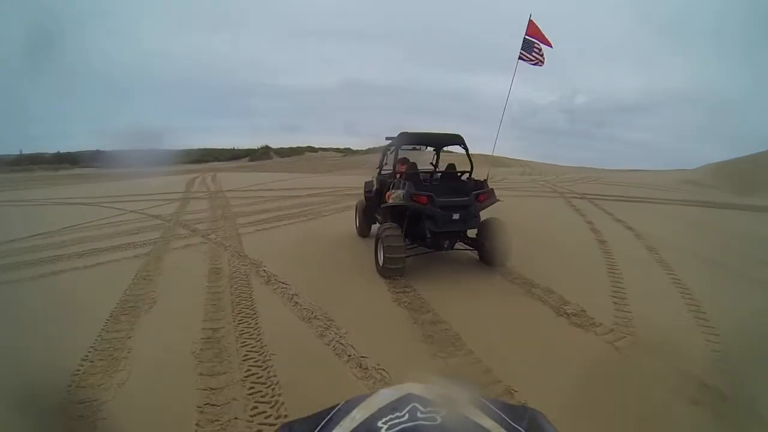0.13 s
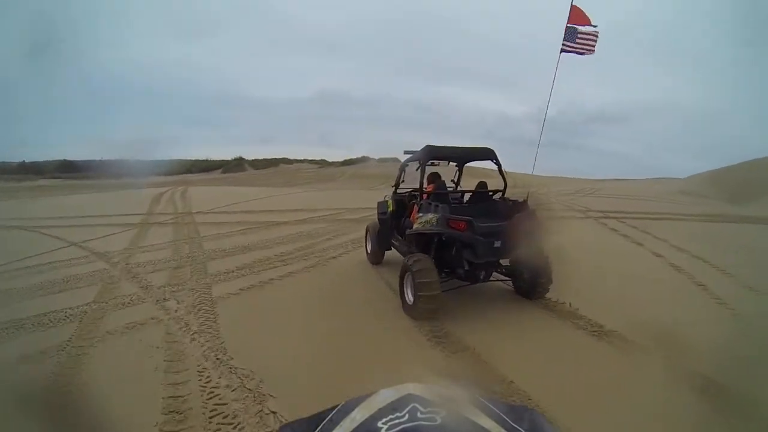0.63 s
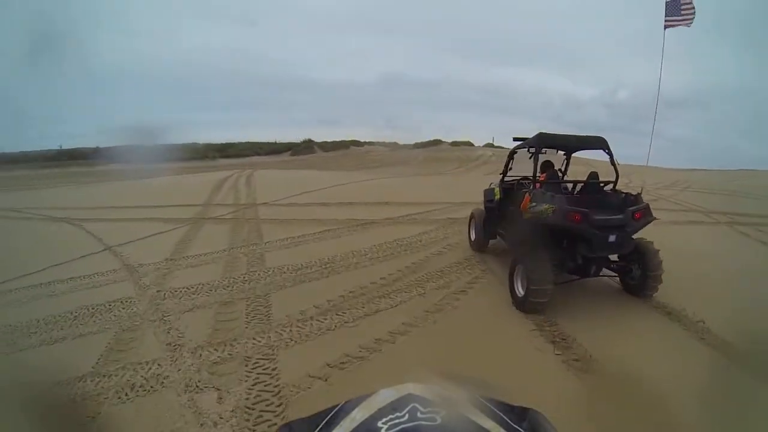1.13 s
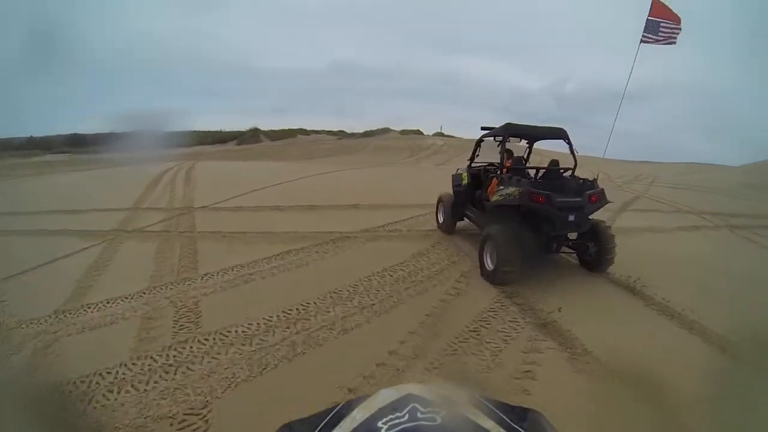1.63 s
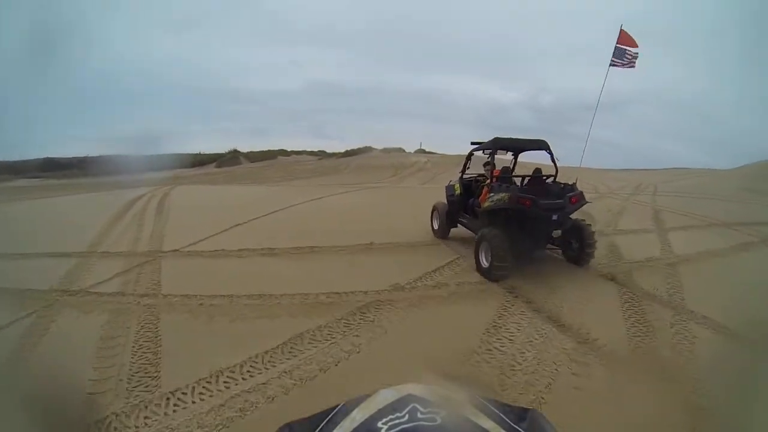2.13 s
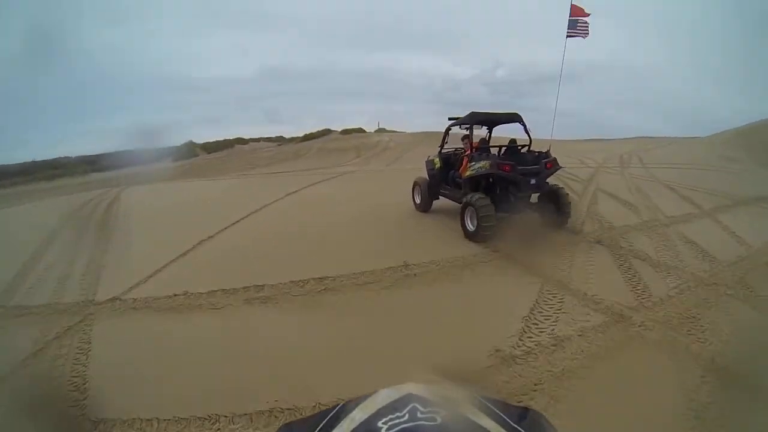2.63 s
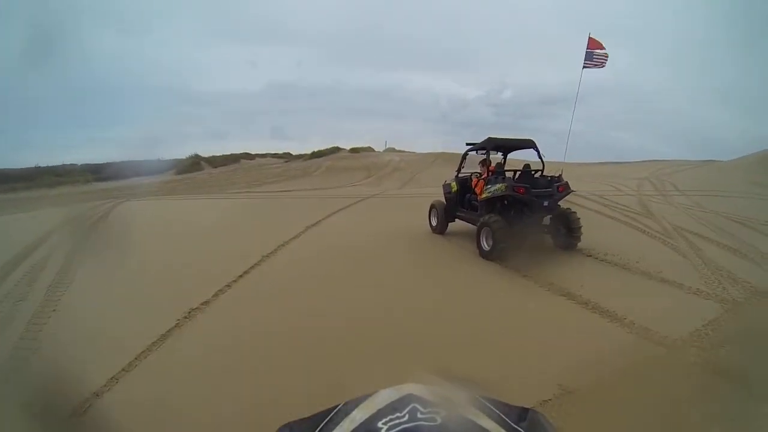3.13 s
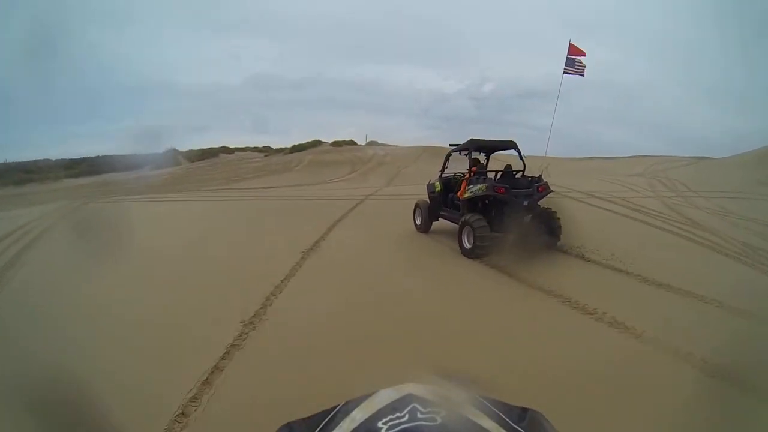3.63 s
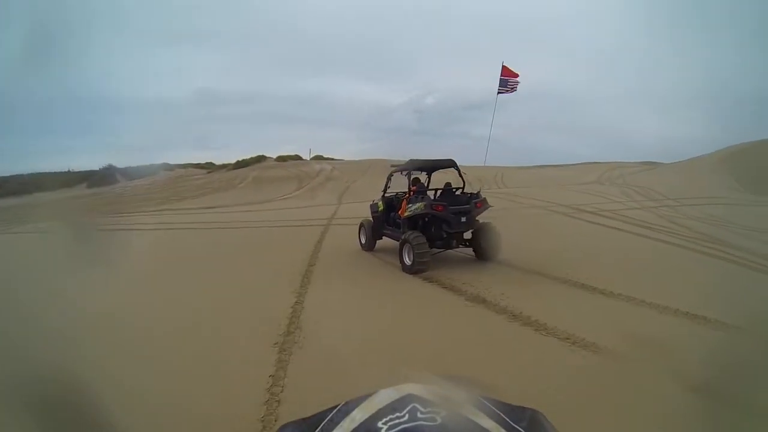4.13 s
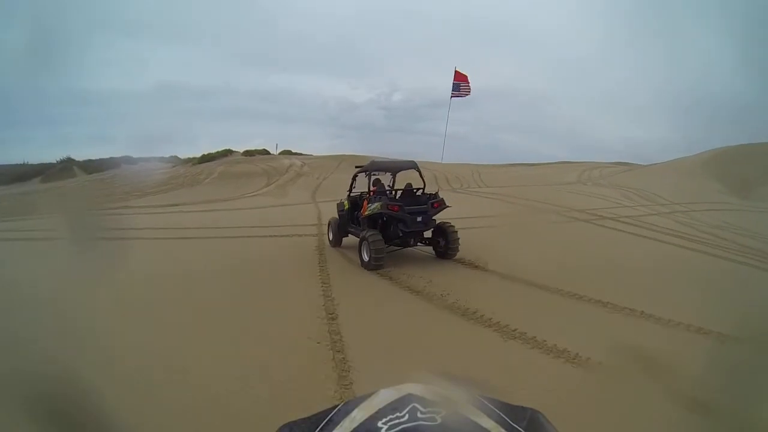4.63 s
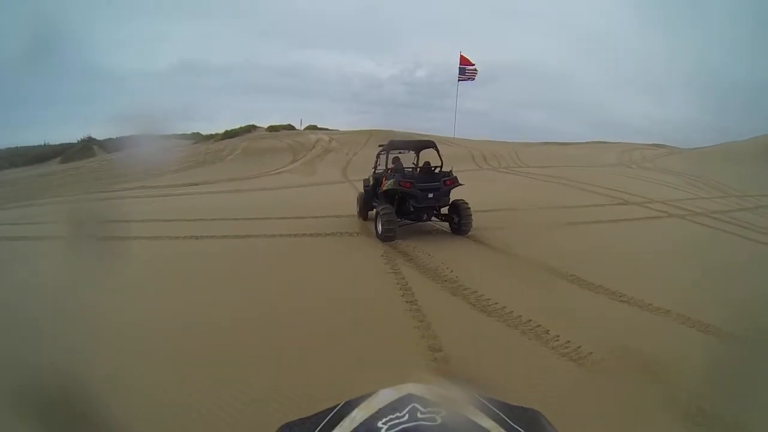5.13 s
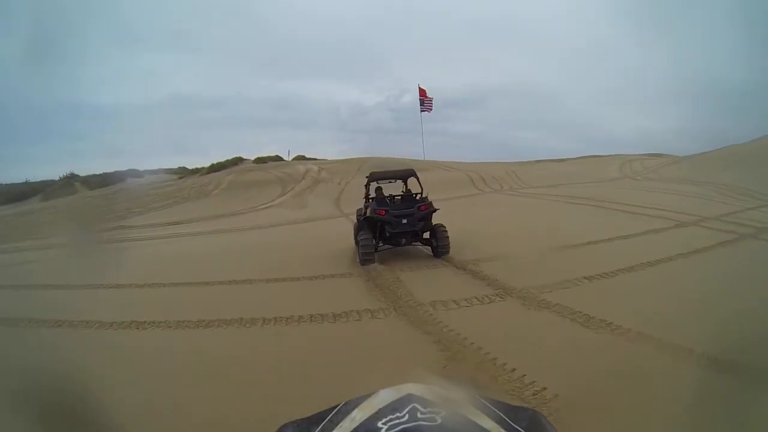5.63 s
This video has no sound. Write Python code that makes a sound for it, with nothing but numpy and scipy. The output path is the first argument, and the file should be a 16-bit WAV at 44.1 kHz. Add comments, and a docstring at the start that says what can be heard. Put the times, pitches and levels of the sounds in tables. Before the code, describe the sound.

Open sand heard through a sealed camera case on a bike rider's helmet: boxy, mid-heavy and dull on top, with a very faint high electronic whine, soft hiss, sand rumble and low wind buffeting throughout. From 0 to 1.8 s a buggy's smooth engine drones and rasps, its belt whistling thinly from about 0.1 to 0.7 s, while the single-cylinder bike coasts with slow, uneven firings and light knocks. At 1.9-2.4 s the bike pulls hard, revs climbing quickly, valve clatter brightening, with a cluster of shell knocks and grit cracks. Wind swells, and deep slams near 2.6 and 2.75 s rock the case until about 2.9 s. A sharp knock lands at 3.15 s. The bike then cruises at a steady fast chug as the buggy fades ahead; small cracks come near 4.2 and 5.65 s, a faint dull thud at 5.4 s, and the engine opens up again at the end.

```python
"""Bike behind a buggy on sand, heard inside a sealed camera case on the rider's helmet; a faint whine throughout.
0-1.8 s: the buggy drones, rasps and whistles its belt early on; the bike's firings ring exhaust and frame, it coasts.
1.9-2.4 s: the bike pulls hard, valve clatter up; knocks, some of them hard firings, ring the shell; grit cracks.
2.4-2.9 s: wind noise swells, two eddies slam the case, which rocks on its mount until the strap stills it.
3 s on: the bike cruises, then opens again; sand rumble, hiss and buffets run on; late cracks, a dull thud at 5.39 s."""
import sys
import numpy as np
from scipy import signal
from scipy.fft import rfft, irfft
from scipy.io import wavfile
from scipy.ndimage import uniform_filter1d

SR = 44100
rng = np.random.default_rng(int(sys.argv[2]) if len(sys.argv) > 2 else 0)


def voltage_ratio(level):
    """Linear amplitude factor for a level in decibels (scalar or array-like)."""
    return 10 ** (np.asarray(level, float) / 20)


def file_out(sig):
    """Save sig as 16-bit WAV at sys.argv[1]."""
    # one column per channel
    cols = np.atleast_2d(sig).T
    # limit, then scale
    lim = np.clip(cols, -1, 1)
    pcm = np.round(lim * 32767).astype(np.int16)
    wavfile.write(sys.argv[1], SR, pcm)


N = 254016


def curve(table):
    """Columns of a time table, one value per sample."""
    s, *columns = np.transpose(table)
    return [np.interp(np.arange(N) / SR, s, c) for c in columns]


def level(x, db):
    """Normalise to unit rms, then apply a gain, fixed or per sample."""
    return x * voltage_ratio(db) / np.sqrt(np.mean(x ** 2))


def butter(x, order, hz, kind="low"):
    """Butterworth filter."""
    return signal.sosfilt(signal.butter(order, hz, kind, fs=SR, output="sos"), x)


def band(x, hz, width_hz):
    """Resonance with gain 1 at its centre."""
    return signal.lfilter(*signal.iirpeak(min(hz, .45 * SR), hz / width_hz, SR), x)


def ring(x, modes):
    """Parallel resonances, two stages each; alternate signs keep the valleys open."""
    out = 0
    for k, (hz, width_hz, db) in enumerate(modes):
        stage_hz = 0.98 * width_hz
        out = out + (-1) ** k * voltage_ratio(db) * band(band(x, hz, stage_hz), hz, stage_hz)
    return out


def colour(x, points):
    """Causal filter through (Hz, dB) points, from the folded cepstrum."""
    hz, db = np.transpose(points)
    grid_hz = np.linspace(1, SR / 2, 2049)
    log_gain = np.interp(np.log(grid_hz), np.log(hz), db) * np.log(10) / 20
    cep = irfft(log_gain)
    cep[1:2048], cep[2049:] = 2 * cep[1:2048], 0
    return signal.fftconvolve(x, irfft(np.exp(rfft(cep))))[:N]


def walk(rate_hz):
    """Random levels held 1 / rate_hz s and slewed twice; spread near 1."""
    k = int(SR / rate_hz)
    steps = np.repeat(rng.standard_normal(N // k + 1), k)
    return 1.3 * uniform_filter1d(uniform_filter1d(steps, k), k)[:N]


def firings(cycles, scatter_db, jitter_ms):
    """One pulse per whole cycle, each a little early or late, strong or weak."""
    chance = rng.standard_normal((int(cycles[-1]) + 1, 2))
    at = np.interp(np.arange(len(chance)), cycles, np.arange(N))
    at = at + chance[:, 0] * jitter_ms * SR / 1000
    pulses = np.zeros(N)
    pulses[np.clip(at, 0, N - 1).astype(int)] = voltage_ratio(scatter_db * chance[:, 1])
    return pulses


def hum(cycles, orders, waver_db, loose):
    """Wavering tones on multiples of the cycle rate; loose 0 = common crest, 1 = random phases."""
    out = 0
    for k, db in orders:
        phase = k * cycles + loose * (rng.random() - .5)
        out = out + voltage_ratio(db + waver_db * walk(7.3)) * np.cos(2 * np.pi * phase)
    return out


def uneven_noise(per_second, spread_db):
    """Sparse noise of very uneven sample sizes, a few large among many small."""
    size = voltage_ratio(spread_db * rng.exponential(size=N))
    return rng.standard_normal(N) * size * (rng.random(N) < per_second / SR)


# shell transmission: f/Hz, relative gain/dB
SHELL_GAIN = [(500, -16), (1030, -20.5), (1320, 1), (1520, -1), (1650, -3), (1950, -10), (2280, -8),
              (2450, -16.5), (3150, -17.5), (3300, -22.5), (3550, -16), (4300, -28.5), (5250, -25.5),
              (6600, -35.5), (7750, -36), (10400, -42), (13000, -41.5), (15000, -57)]


def through_case(x):
    """The sealed shell passes its resonances and dulls the top."""
    return colour(x, SHELL_GAIN)


def camera_whine():
    """Camera electronics chirp once a frame: a tone with unsteady phase, gated at the frame rate."""
    whine_hz, frames_per_s, first_frame_s, peak_db, sharpness = 11405, 59.92, .012, -71.5, 2.5
    t = np.arange(N) / SR
    frame_phase = 2 * np.pi * frames_per_s * (t - first_frame_s)
    chirp = np.exp(sharpness * (np.cos(frame_phase) - 1))
    tone = np.sin(2 * np.pi * (whine_hz * t + .3 * walk(frames_per_s)))
    return voltage_ratio(peak_db) * chirp * tone


# tyres on sand: f/Hz, relative level/dB
SAND_SPECTRUM = [(35, -15), (65, -20), (100, -7.5), (180, -8.5), (260, -13.5), (320, -22), (450, -16),
                 (800, -26), (1100, -27.5), (2400, -75)]


def sand():
    """Tyres churning soft sand: a dull, uneven rumble."""
    rumble = voltage_ratio(0.53 * walk(2.5)) * rng.standard_normal(N)
    return level(colour(rumble, SAND_SPECTRUM), -46.5)


# gusts: t/s, strength over calm/dB, half length (to 1/e)/s
GUST_SWELLS = [(0.046, 6, 0.076), (0.547, 3, 0.19), (0.948, 3.5, 0.34), (2.266, 4.5, 0.18),
               (2.415, 11, 0.078), (2.56, 6, 0.08), (2.794, 0, 0.068), (3.303, 4.5, 0.3),
               (4.151, -0.5, 0.14), (4.551, 1, 0.22), (5.451, 4, 0.28)]


def gust():
    """Wind strength over the calm, in dB: smooth swells."""
    t = np.arange(N) / SR
    return sum(db * np.exp(-((t - s) / half_s) ** 2) for s, db, half_s in GUST_SWELLS)


# hiss tilt: f/Hz, relative gain/dB
HISS_COLOUR = [(800, -2.5), (1200, -3.5), (1450, 1), (1750, -2.5), (2500, 1), (13000, -4)]


def wind_hiss(puffs):
    """Turbulent air past the shell: noise in short puffs, slightly following the gusts."""
    calm_db, gust_share = -39.5, 0.022
    noise = puffs * voltage_ratio(0.35 * walk(7.4)) * rng.standard_normal(N)
    return level(through_case(colour(noise, HISS_COLOUR)), calm_db + gust_share * gust())


# eddies striking the case: t/s, level before rocking/dB, swing f/Hz, half length (to 1/e)/ms
EDDIES = [(2.6029, -1.9, 30.6, 17.3), (2.7506, -11, 26.1, 16.5)]


def wind_buffets():
    """Slow pressure swings and single eddies push the case, which rocks on its mount."""
    mount_hz, mount_width_hz, mount_db = 46.1, 5.4, -3
    rock_width_hz, rock_db, eddy_lead_ms = 2.3, 10.2, 2.05
    settled_s, settle_s, calm_db = 2.92, .1, -37
    t = np.arange(N) / SR
    push = level(butter(butter(rng.standard_normal(N), 8, 48), 1, 6, "high"), 0)
    push = 0.5 * push + voltage_ratio(mount_db) * band(push, mount_hz, mount_width_hz)
    push = level(push, calm_db + gust())
    eddies = 0
    for s, db, hz, half_ms in EDDIES:
        swell = np.exp(-((1000 * (t - s) + eddy_lead_ms) / half_ms) ** 2)
        eddies = eddies + voltage_ratio(db) * swell * np.sin(2 * np.pi * hz * (t - s))
    # the strap pulls tight and stills the rocking left by the eddies
    loose = np.clip((settled_s - t) / settle_s, 0, 1)
    return push + eddies + voltage_ratio(rock_db) * band(eddies, mount_hz, rock_width_hz) * loose


# knocks in the shell, some of them hard engine firings: t/s, peak level/dB
SHELL_KNOCKS = [(0.066, -25.5), (0.222, -23), (.754, -25.5), (.932, -33), (.944, -29), (1.103, -25),
                (1.288, -24.5), (1.472, -30), (1.953, -18), (2.088, -20), (2.1208, -24.5), (2.166, -19.5),
                (2.176, -19.5), (2.22, -27), (2.2543, -19.5), (2.3454, -18.5), (2.378, -25), (2.393, -18),
                (2.981, -18), (3.1484, -14), (3.328, -32), (3.516, -24), (3.526, -26), (3.696, -26.5),
                (3.705, -24.5), (3.7436, -28)]


def knocks():
    """Knocks in the shell, some of them hard engine firings: a soft short burst rings its resonances."""
    top_hz, decay_ms = 3000, 2.4
    out, t = np.zeros(N + 2048), np.arange(2048) / SR
    shell = through_case(butter(np.eye(1, N)[0], 2, top_hz))[:len(t)]
    for s, db in SHELL_KNOCKS:
        burst = rng.standard_normal(len(t)) * np.exp(-1000 * t / decay_ms)
        knock = np.convolve(burst, shell)[:len(t)]
        out[int(s * SR):int(s * SR) + len(t)] += voltage_ratio(db) * knock / abs(knock).max()
    return out[:N]


# bright cracks of grit, and one dull thud at 5.39 s: t/s, peak level/dB, centre f/Hz
SHORT_BURSTS = [(0.065, -22, 2530), (.1, -46, 7000), (.2124, -43, 7900), (.229, -44, 6940),
                (0.9437, -28, 2680), (1.117, -27, 2160), (1.953, -32, 4960), (2.1212, -30, 4860),
                (2.2005, -45, 8000), (2.2867, -26, 2680), (2.345, -23, 4450), (2.393, -20, 2300),
                (2.592, -32, 5900), (2.62, -43, 7980), (2.68, -43, 8006), (3.1489, -16, 2970),
                (3.1485, -28.5, 6230), (4.186, -33, 7600), (4.187, -28.5, 2990), (4.268, -26.5, 2310),
                (4.287, -49, 9000), (4.308, -43, 7800), (5.2735, -47, 11080), (5.386, -33, 398),
                (5.482, -44, 10300), (5.642, -41, 7000), (5.6578, -36.5, 6630), (5.658, -29, 3580)]


def cracks_and_thud():
    """Short noise bursts: bright cracks of grit, and one dull thud; brighter ones die sooner."""
    decay_ms_at_1k, shortening = 3.2, 0.54
    out, t = np.zeros(N + 2048), np.arange(2048) / SR
    for s, db, hz in SHORT_BURSTS:
        decay = np.exp(-1000 * t / decay_ms_at_1k * (hz / 1000) ** shortening)
        blow = rng.standard_normal(len(t)) * decay
        body = band(band(band(blow, hz, .6 * hz), hz, .6 * hz), hz, hz)
        burst = body + .02 * band(blow, 3 * hz, 3 * hz)  # thin edge above
        out[int(s * SR):int(s * SR) + len(t)] += voltage_ratio(db) * burst / abs(burst).max()
    return out[:N]


def buggy_belt():
    """Drive belt whistles as the buggy pulls away: a tone gliding up to its pitch."""
    from_s, to_s, fade_s, mean_db = 0.11, 0.72, .06, -41
    final_hz, rise_hz, settle_s = 1520, 109.6, 0.11
    t = np.arange(N) / SR
    slip = np.clip(np.minimum(t - from_s, to_s - t) / fade_s, 0, 1)
    belt_hz = final_hz - rise_hz * np.exp(-np.maximum(t - from_s, 0) / settle_s)
    return slip * voltage_ratio(mean_db + 1.2 * walk(27.2)) * np.sin(2 * np.pi * np.cumsum(belt_hz) / SR)


# buggy engine: t/s, firing f/Hz, throttle level/dB
BUGGY_ENGINE = [(0, 32.2, -10), (.2, 34, -8), (.32, 35.5, -1), (.5, 37.15, -0.5), (.8, 38.27, -1),
                (1.3, 39.02, -0.3), (1.6, 39.1, -1), (1.75, 38.08, -4), (2.2, 37.42, 1), (2.7, 37.06, -0.5),
                (3.2, 37.86, 1.5), (4, 37.97, 1), (4.8, 38.72, 0.5), (5.5, 39.32, -2.5), (5.76, 39.1, 0)]
# drone: multiple of firing f, relative level/dB
BUGGY_TONES = [(2, -8), (3, -8), (4, -2.5), (5, 0), (6, -15), (6.5, -14), (7, -17)]
# tailpipe: f/Hz, nominal width/Hz, relative level/dB
BUGGY_TAILPIPE = [(462, 29, 1), (552, 62, 6), (690, 40, -8), (768, 30, -4), (873, 14, -6)]


def buggy():
    """Smoother twin drawing away: firing-rate tones drone, firing pulses rasp in the tailpipe."""
    drone_db, drone_share, rasp_db, recede_db_per_s = -39, 0.077, -46.5, 2
    hz, throttle_db = curve(BUGGY_ENGINE)
    cycles = np.cumsum(hz) / SR
    away_db = -recede_db_per_s * np.arange(N) / SR
    drone = hum(cycles, BUGGY_TONES, waver_db=.4, loose=1)
    drone = level(drone, drone_db + away_db + drone_share * throttle_db)
    rasp = ring(firings(cycles, scatter_db=.6, jitter_ms=.03), BUGGY_TAILPIPE)
    return drone + level(rasp, rasp_db + away_db + throttle_db) + buggy_belt()


def lobe(cycles, at_cycle, sharpness):
    """Smooth crest once a cycle, peak 1."""
    return np.exp(sharpness * (np.cos(2 * np.pi * (cycles - at_cycle)) - 1))


def rattle(cycles, at_cycle):
    """Quick rise and slower decay from one point of each cycle."""
    since = (cycles - at_cycle) % 1
    return np.exp(-since / .11) * (1 - np.exp(-since / .025))


def bike_burst(cycles, fires_at):
    """Noise envelope of a cycle: firing, following valves, early valve, chain between."""
    strength = voltage_ratio(1.4 * rng.standard_normal(int(cycles[-1]) + 2))[(cycles + .5).astype(int)]
    firing = rattle(cycles, fires_at) + voltage_ratio(-3) * rattle(cycles, .02)
    early_valve = voltage_ratio(-15) * lobe(cycles, -.32, 12.0)
    return strength * (firing + early_valve + voltage_ratio(-22))


# air box: f/Hz, nominal width/Hz, relative level/dB
AIR_BOX = [(871, 230, -13.5), (1270, 280, -3.5), (1671, 100, 4)]


def bike_intake(cycles, puffs, throttle_db):
    """Intake air roars in the air box, breathing once a cycle."""
    breath = lobe(cycles, -.06, .4)
    return level(ring(puffs * breath * rng.standard_normal(N), AIR_BOX), -41 + throttle_db)


# valve gear and chain load: t/s, clatter level/dB
VALVE_LOAD = [(0, -46), (.5, -49), (.95, -43.5), (1.4, -45.5), (1.8, -48.5), (1.93, -37), (2.4, -39),
              (2.7, -42), (3.5, -43), (4.4, -45), (5.4, -47.5), (5.76, -44.5)]
# clatter tilt: f/Hz, relative gain/dB
CLATTER_COLOUR = [(1000, -2), (1450, -4), (1900, 5), (2300, 2), (2800, -3), (5200, 3), (7000, 0),
                  (13000, -1)]


def bike_clatter(burst):
    """Valve gear and chain rattle as uneven noise; the treble opens with load."""
    split_hz, full_top_db, top_share = 5800, -37, 0.51
    load_db = curve(VALVE_LOAD)[0]
    noise = burst * uneven_noise(per_second=6000, spread_db=1.5)
    clatter = through_case(colour(noise, CLATTER_COLOUR))
    top_gain = voltage_ratio(top_share * (load_db - full_top_db))
    # minus: the two halves are in antiphase at the split
    clatter = butter(clatter, 2, split_hz) - top_gain * butter(clatter, 2, split_hz, "high")
    return level(clatter, load_db)


# exhaust: f/Hz, nominal width/Hz, relative level/dB
EXHAUST_MODES = [(316, 55, -2), (426, 61, 5), (700, 28, -2)]
# crank and frame hum: multiple of firing f, relative level/dB
FRAME_TONES = [(2, -2), (3, -17), (4, -1), (5, -4.5), (6, -8), (7, -12), (8, -8), (9, -17)]


def bike_exhaust(pulses, cycles, hz, burst, throttle_db):
    """Firings ring the pipe, gas puffs behind each; crank and frame hum, more at higher revs."""
    full_db, crest_at, quiet_hz, db_per_root_hz = -39, -.1, 22.27, 2.5
    frame_db = db_per_root_hz * np.maximum(hz - quiet_hz, 0) ** .5
    pipe = level(ring(pulses, EXHAUST_MODES), -16.5)
    frame = level(hum(cycles - crest_at, FRAME_TONES, waver_db=.9, loose=0.45), frame_db)
    gas = level(band(burst * rng.standard_normal(N), 370, 95), -13.0)
    return voltage_ratio(full_db + throttle_db) * (pipe + frame + gas)


def bike_thud(pulses, throttle_db):
    """Each firing thuds a frame panel."""
    return level(ring(pulses, [(254.3, 44.3, 0)]), -45.5 + 0.68 * throttle_db)


# bike engine: t/s, firing f/Hz
BIKE_REVS = [(0.0, 17.62), (0.55, 15.2), (1.15, 16.79), (1.75, 15.11), (1.85, 16.12), (2.15, 22.4),
             (2.3, 22.94), (2.6, 21.26), (2.8, 22.4), (4.0, 22.17), (4.4, 22.49), (4.8, 22.28),
             (5.76, 23.88)]
# coasting, hard pull, cruising, opening again: t/s, level re full throttle/dB
BIKE_THROTTLE = [(0, -6), (.5, -19), (1, -9), (1.85, -9.5), (1.95, -1.5), (2.2, 1.5), (2.45, -2.5),
                 (3, -3.5), (3.8, -2.5), (4.2, -2.5), (4.6, -3), (5.1, -3), (5.35, -2.5), (5.76, -.5)]


def bike(puffs):
    """Single cylinder: one firing a cycle drives exhaust, frame, valve gear and intake."""
    first_cycle, fires_at = -0.046, -.18  # parts of a cycle
    hz, throttle_db = curve(BIKE_REVS)[0], curve(BIKE_THROTTLE)[0]
    cycles = first_cycle + np.cumsum(hz) / SR
    burst = bike_burst(cycles, fires_at)
    pulses = firings(cycles - fires_at, scatter_db=-0.75, jitter_ms=0.081)
    exhaust = bike_exhaust(pulses, cycles, hz, burst, throttle_db)
    thud = bike_thud(pulses, throttle_db)
    return exhaust + thud + bike_clatter(burst) + bike_intake(cycles, puffs, throttle_db)


def scene():
    """Everything as it reaches the one microphone inside the case."""
    puffs = voltage_ratio(2 * walk(200))  # shared by hiss and intake
    background = camera_whine() + sand() + wind_hiss(puffs) + wind_buffets()
    taps = knocks() + cracks_and_thud()
    return (background + taps + buggy() + bike(puffs))[None]


def low_pass(x):
    """Removes everything above the highest recorded frequency."""
    return signal.sosfilt(signal.butter(12, 15550, fs=SR, output="sos"), x)


def record(dry):
    """The camera rolls off the top."""
    dull = butter(dry, 8, 15300)
    return low_pass(dull)


dry = scene()
out = record(dry)
file_out(out)
```